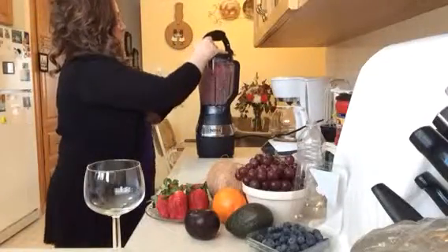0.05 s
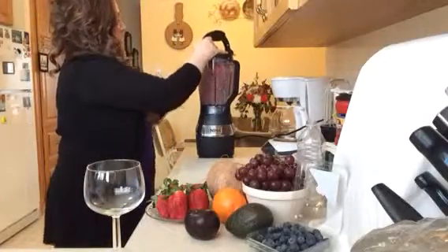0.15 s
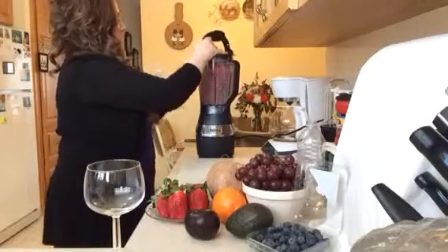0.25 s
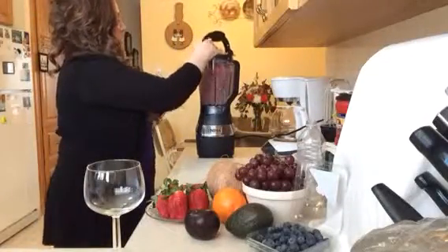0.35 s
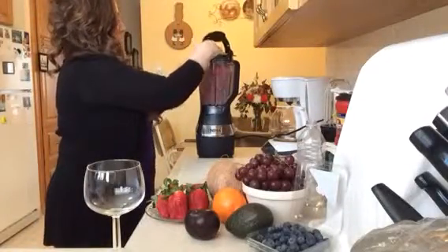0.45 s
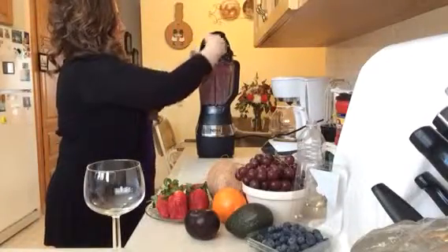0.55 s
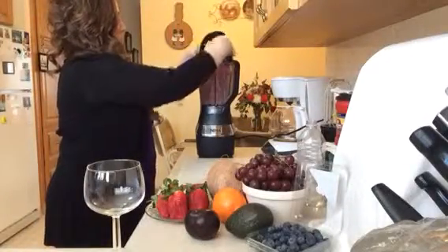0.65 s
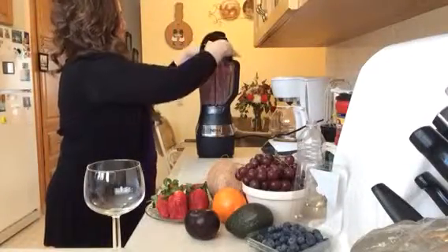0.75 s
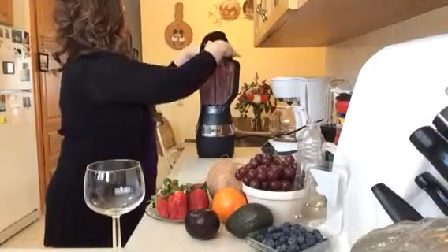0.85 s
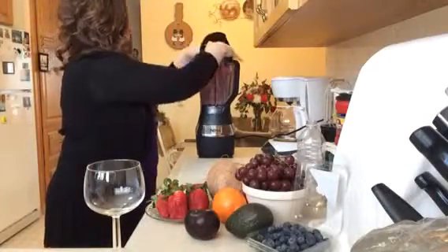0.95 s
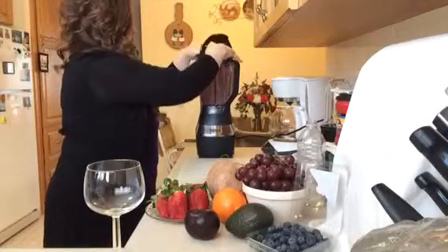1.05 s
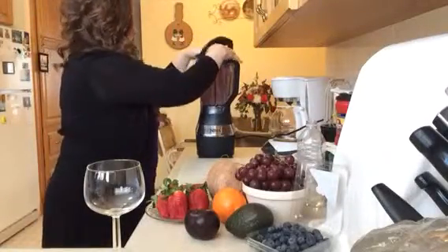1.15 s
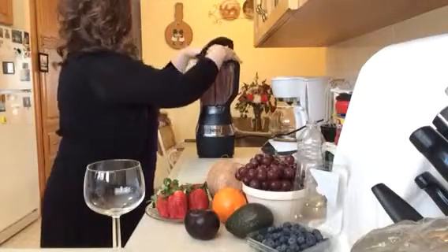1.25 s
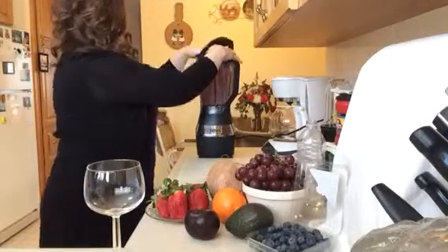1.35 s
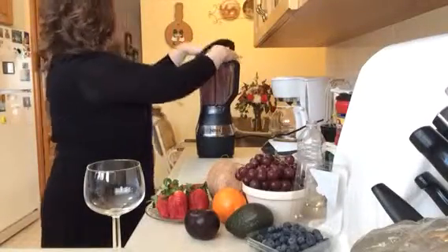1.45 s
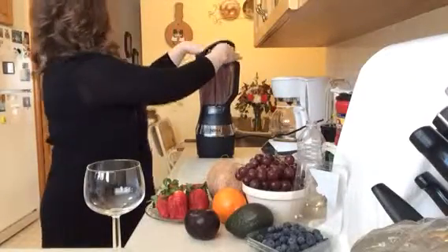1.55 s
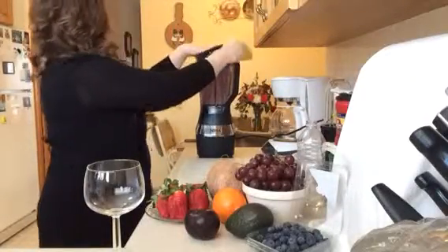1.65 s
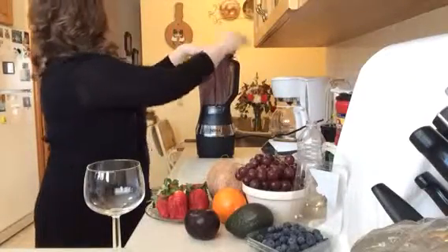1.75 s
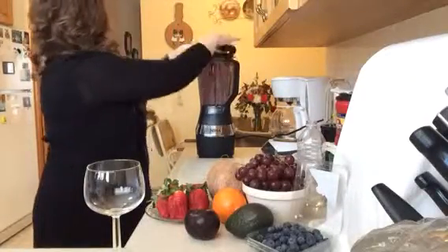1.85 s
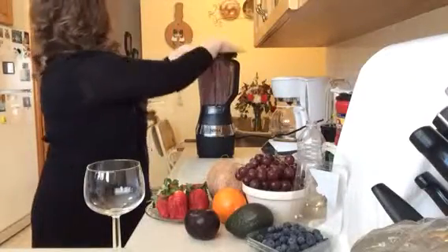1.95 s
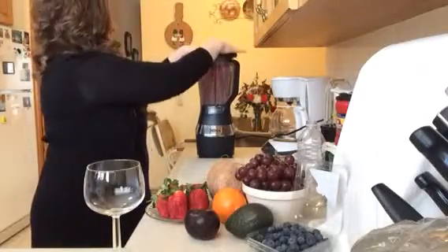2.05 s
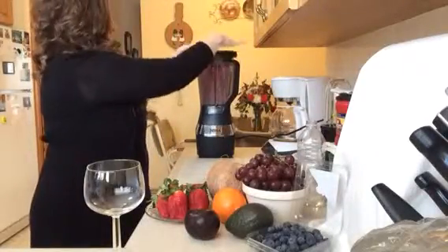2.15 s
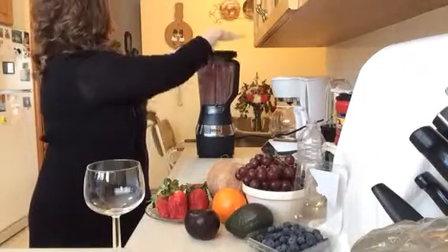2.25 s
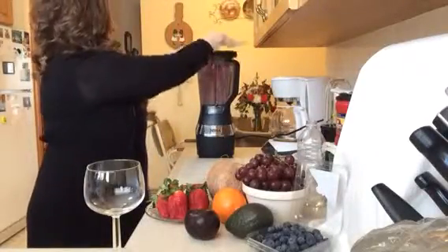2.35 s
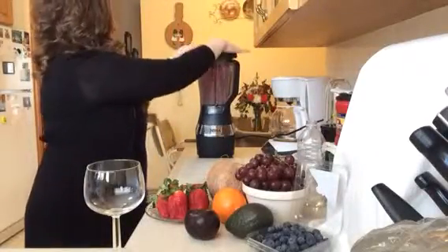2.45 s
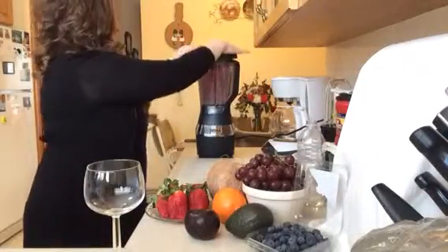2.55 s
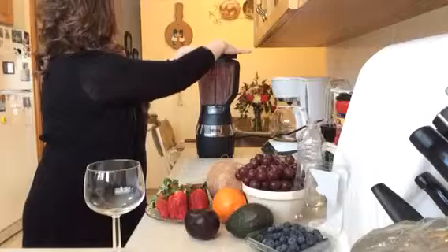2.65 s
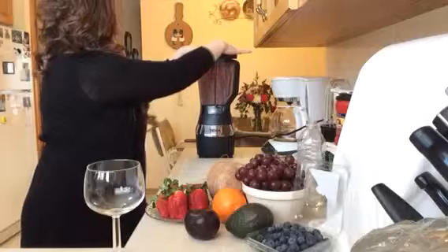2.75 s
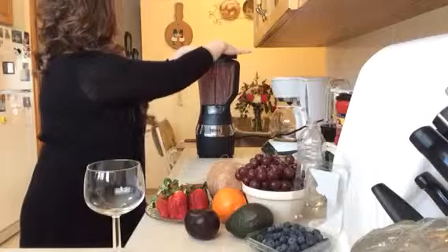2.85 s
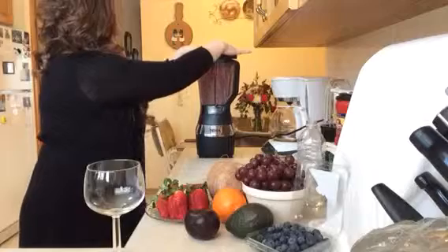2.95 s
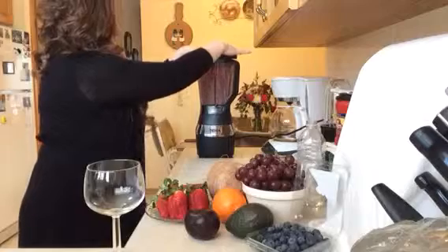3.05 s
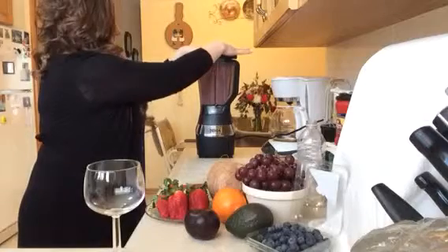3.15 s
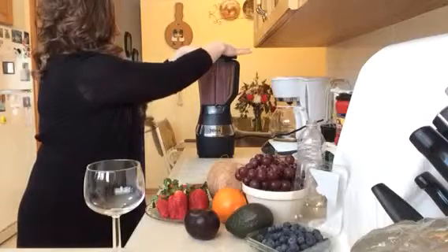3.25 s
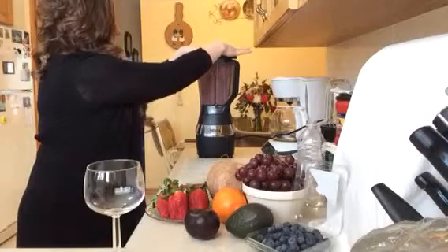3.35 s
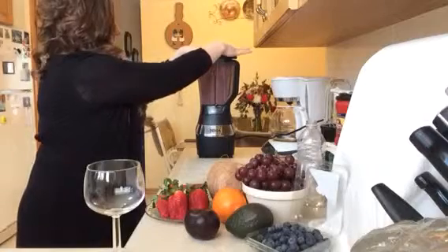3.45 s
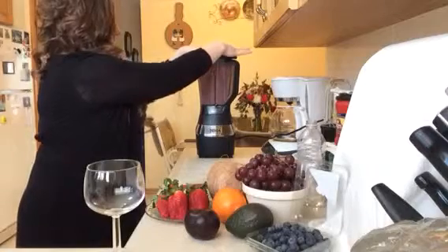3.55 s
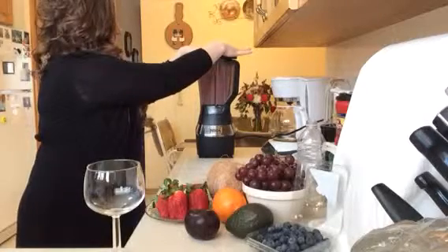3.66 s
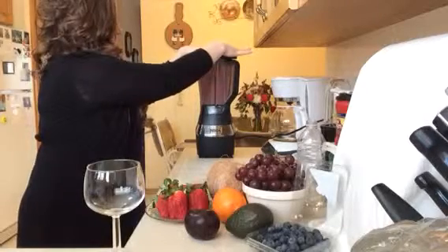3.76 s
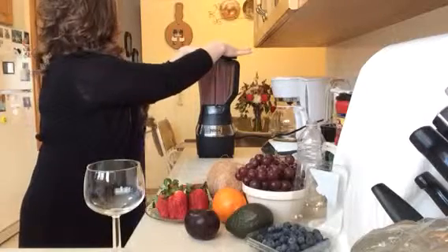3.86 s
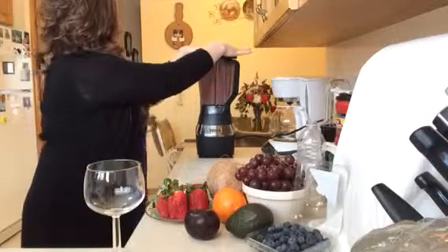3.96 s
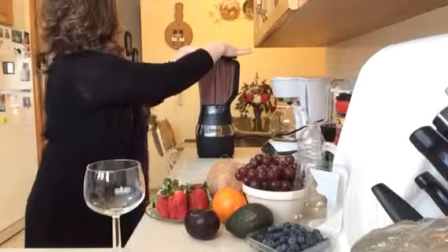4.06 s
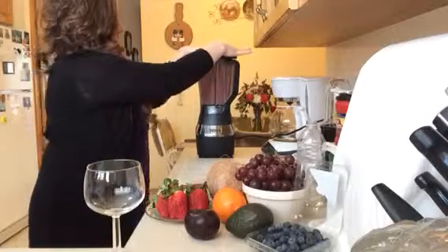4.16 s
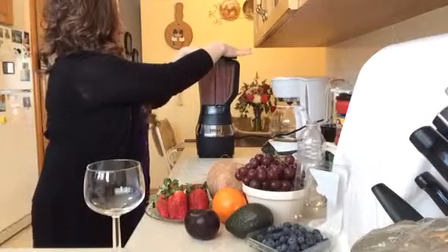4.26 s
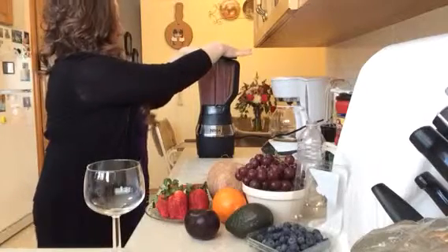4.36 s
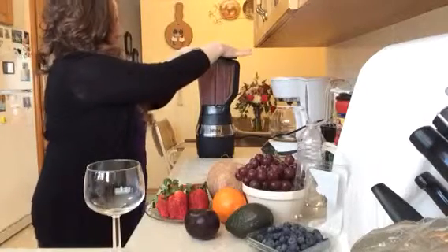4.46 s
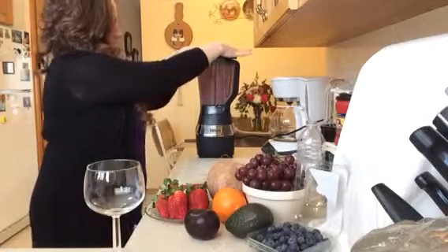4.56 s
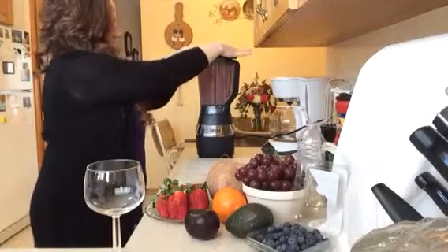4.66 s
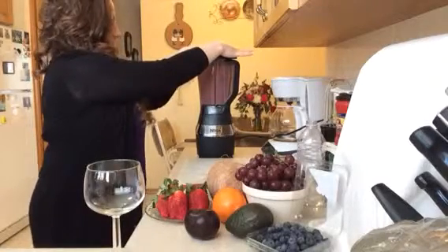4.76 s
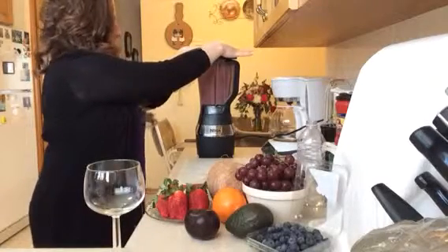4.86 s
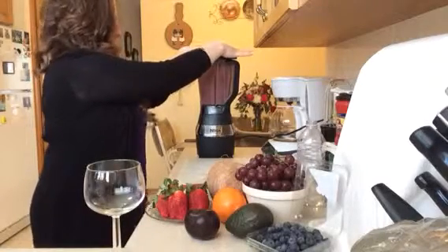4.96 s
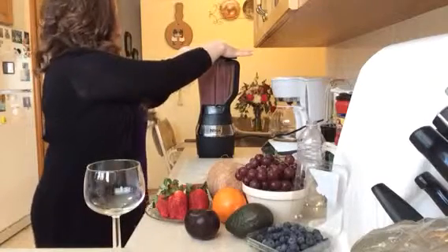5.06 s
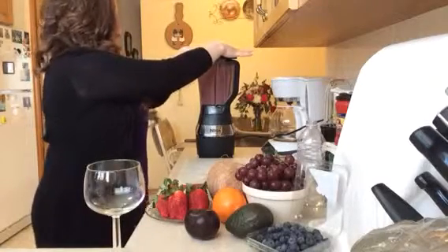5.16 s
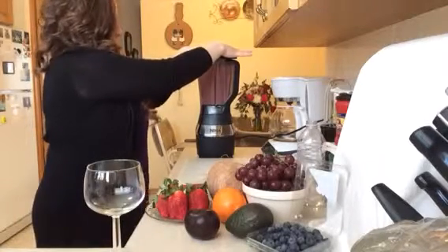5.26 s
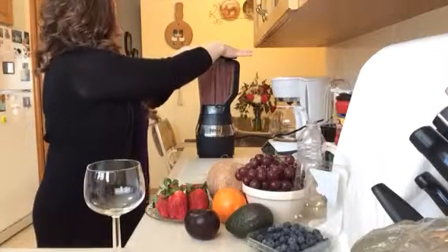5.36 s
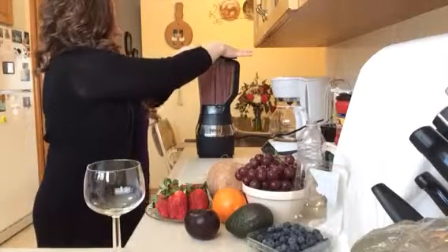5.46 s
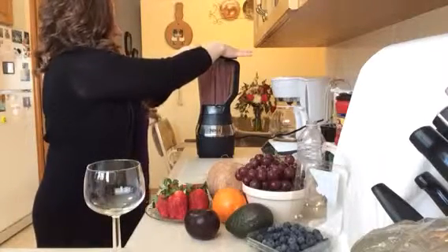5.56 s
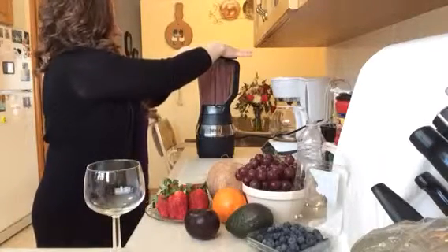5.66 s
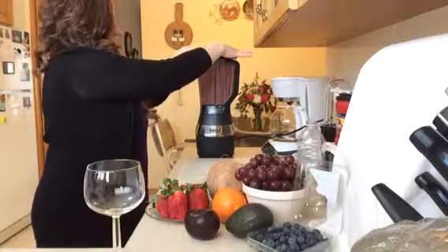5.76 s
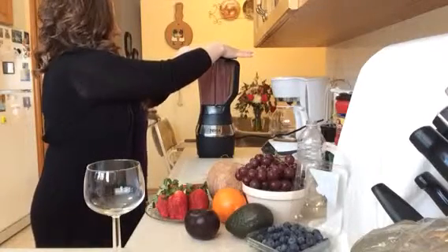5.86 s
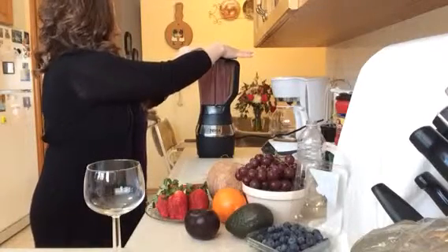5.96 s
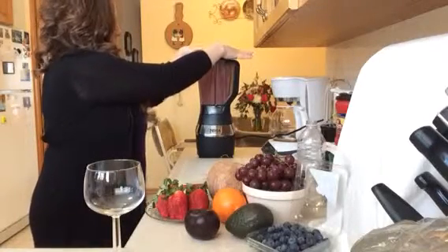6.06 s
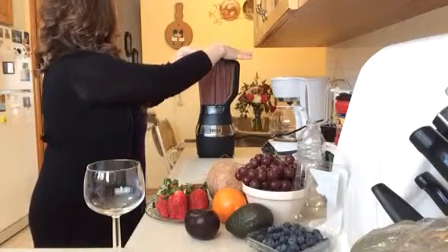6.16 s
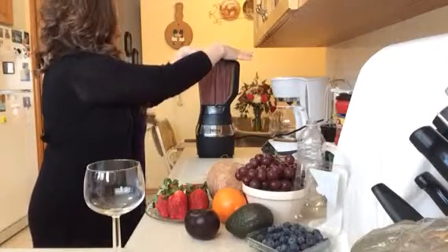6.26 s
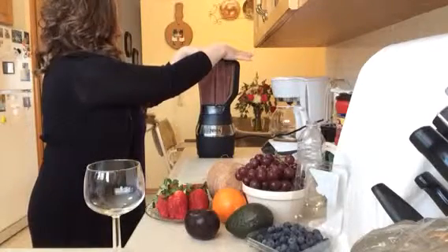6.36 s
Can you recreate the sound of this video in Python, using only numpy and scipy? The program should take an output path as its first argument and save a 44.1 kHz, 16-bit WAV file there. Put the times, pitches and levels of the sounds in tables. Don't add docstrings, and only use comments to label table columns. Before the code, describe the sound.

Soft plastic lid taps and clicks, a hard palm slap, a switch snap, then a blender spins up and roars steadily in a kitchen.

```python
import sys
import numpy as np
from scipy import signal
from scipy.fft import rfft, irfft
from scipy.io import wavfile

SR = 44100
rng = np.random.default_rng(int(sys.argv[2]) if len(sys.argv) > 2 else 0)


def volts_from_db(level):
    exponent = np.asarray(level, float) / 20
    return 10 ** exponent


def wrap_up_sound(samples):
    columns = np.atleast_2d(samples).T
    tamed = np.clip(columns, -1, 1)
    steps = np.round(tamed * 32767).astype(np.int16)
    wavfile.write(sys.argv[1], SR, steps)


N = 283122

# multiple_of_shaft_speed, level_db
LOW_ORDERS = [(9, -6), (11, -6), (12, 2), (14, -5), (24, -6)]
HIGH_ORDERS = [(36, 1), (48, -5.5), (60, -7.5)]
# frequency_hz, density_db_per_hz
CHURN_SPECTRUM = [(18, -60), (30, -23.5), (119, -9), (154, -8), (188, -3), (302, -9), (526, -16.5),
                  (684, -15.5), (846, -18.5), (1500, -19), (1950, -63), (3300, -120)]
HOUSING_SPECTRUM = [(820, -34), (1400, -13), (1690, 1.5), (2030, -0.5), (3390, -8), (4510, -10.5),
                    (5200, -32), (6760, -72), (11400, -120)]
AIR_SPECTRUM = [(2940, -22), (5000, -3), (6660, 0.5), (7250, -4.5), (8670, -4), (12900, -14.5),
                (14100, -14.5), (15400, 1)]
# centre_hz, width_hz, height_db over the broad noise
JUG_RINGS = [(126.6, 21, 6), (240.3, 11.3, 4.5), (526.5, 120, 8), (621, 9.7, 11.5), (836, 97, 4.5),
             (1036.7, 9.2, 10.5), (1260, 10.5, 8)]
HOUSING_RINGS = [(1649, 20, 4), (1744, 3.3, 15), (2012, 26, 2.5), (2350, 33, 3), (2347, 14, -1.5),
                 (2820, 180, 0), (3175, 12, 6), (3630, 41, 8.5), (4370, 8, 6), (4910, 840, 4)]
AIR_RINGS = [(5510, 89, -3), (6410, 54, -10), (7400, 33, -32), (8220, 160, -9), (9340, 65, -37),
             (10800, 200, 0)]
# time_s, size
SURGES = [
    (2.745, 1.2),
    (3.28, .2),
    (3.73, .9),
]
# start_s, peak_db
THUMPS = [
    (3.158, -39),
    (3.278, -15),
    (3.468, -16),
    (3.547, -26),
    (3.712, -23),
    (4.216, -46),
    (4.837, -42),
]
# frequency_hz, level_db, t60_s
BASE_MODES = [(124.7, 1.5, 0.3), (191, -44, 0.11), (231.5, -8, 0.063), (655, -21, 0.035)]
JOLT_MODES = [(127, .5, .2), (250, -4, .06), (610, -12, .06), (1350, -16, .04)]
# frequency_hz, level_db, t60_s
LID_MODES = [(1510, -6, 0.005), (2756, -5, 0.012), (3280, -3, 0.0074), (3920, -6, 0.0051),
             (4780, -3.5, 0.0037)]
JUG_WALL_MODES = [(268, -3.5, 0.044), (320, -3.5, 0.011), (570, -4.5, 0.013), (604, -6, 0.013),
                  (810, -10.5, 0.0067)]
RIM_MODES = [(6300, 0, .002), (8200, 1, .0025), (10300, -6, .0015)]
# start_s, peak_db, thud_db (rel), brightness_db (rel)
KNOCKS = [(0.043, -54.5, 8, -15), (0.148, -64.5, 16, -14), (0.374, -60.5, 16, -3), (0.484, -55.5, -4, -19),
          (0.655, -75, 1, -15), (0.7344, -67, 5, -16), (1.0107, -45, -13, -26), (1.0133, -49.5, 11.5, -29),
          (2.062, -52, 5, -15)]
CLICKS = [(0.843, -50.5, -5, -8), (1.11, -55, -6, -10), (1.128, -44.5, -5, -23), (1.152, -52, 2, -23),
          (1.272, -36.5, -3, -31), (1.292, -33.5, -4.5, -32), (1.3126, -44.5, -6, -33),
          (1.558, -62.5, 7, 2), (1.619, -47.5, -2, -15), (1.6916, -30.5, -8.5, -22),
          (1.7144, -43.5, 4.5, -5), (1.7718, -28, -4, -12.5), (1.786, -45.5, 10, -6),
          (2.736, -24.5, -10, -60)]
SLAPS = [
    (2.0998, -10, -19.5, -15.5),
    (2.103, -14, -18.5, -7),
    (2.108, -12.5, -14.5, -11.5),
    (2.1135, -19.5, -5, -9.5),
    (2.212, -32, -2, -32),
    (2.229, -34.5, -12, -27),
]
SWITCH = [
    (2.5522, -17, -16, -17),
    (2.558, -27, -4.5, -31),
]
# loudest_s, pitch_hz there, squeak_db, hiss_db just after
SLIPS = [
    (.272, 4370, -68, -68.5),
    (.418, 4100, -67, -68),
]
# frequency_hz, level_db
WALLS = [(150, -21), (600, 5), (3000, -4.9), (9000, -0.5), (15000, -5)]
# frequency_hz, t60_s
KITCHEN = [(100, 0.22), (500, 0.24), (3000, 0.26), (8000, 0.24), (15000, 0.15)]
# frequency_hz, level_db rms
FRIDGE = [(59.2, -55.5), (118.4, -64.5), (166.9, -74), (242.2, -73)]
# frequency_hz, density_db_per_hz
FLOOR_SPECTRUM = [(15, -23), (25, -4), (69, -25), (104, -2.5), (288, -13), (443, -10), (682, -27.5),
                  (1140, -29.5), (1260, -31), (2990, -37), (3710, -36.5), (8760, -42.5), (15400, -52.5)]

# level_db at running speed, db_per_db of speed, strain_db extra at the start
LOW_WHINE, HIGH_WHINE = (-48, .9, 12), (-52, 6.5, 14)
CHURN_LAW, HOUSING_LAW, AIR_LAW = (-30.5, 0.49, 3.9), (-34.5, 0.98, 2.2), (-40.5, 1.14, 0.5)
# ring_hz, ring_db, chatter_s
KNOCK, CLICK, SLAP, SNAP = (1970, 4.4, .011), (3700, 3.5, .011), (3250, 0, .0044), (2800, 1.8, .0044)

START_S = 2.735
RUNNING_SPEED, GAIN_PER_S = 174.5, 4.5
ROTOR_LAG, ROTOR_S = 120, .095
PULP_LAG, PULP_S = 32, .25
STRAIN_S, SMOOTH_S = 0.56, 2.27
SHAKE_DB, SHAKE_DAMPED_DB = -30, 14.5
BLUR_DB_PER_S, LUMPS_DB = 1.8, .9
SURGE_DB, SURGE_S = 4, .04
JOLT_S, JOLT_DB = 2.737, -20
PUSH_S, PUSH = 0.00039, .5
GLIDE_HZ_PER_S, SQUEAK_DB_PER_S = 17000, 600
HISS_LAG_S, HISS_RISE_DB_PER_S, HISS_FALL_DB_PER_S = (0.037, .001), 330, (120, 600)
RUB_S, RUB_DB = (.25, .56), -85
FLOOR_DB = -60.5


def run_up():
    since = np.arange(N) / SR - START_S
    t = np.maximum(since, 0)
    rotor_lag = ROTOR_LAG * np.exp(-(t / ROTOR_S) ** 1.5)
    pulp_lag = PULP_LAG * np.exp(-t / PULP_S)
    turns = RUNNING_SPEED + GAIN_PER_S * t - rotor_lag - pulp_lag
    speed_db = 20 * np.log10(np.minimum(turns / RUNNING_SPEED, 1))
    strain = np.exp(-t / STRAIN_S)

    def gain(law):
        level_db, db_per_db, strain_db = law
        return (since >= 0) * volts_from_db(level_db + db_per_db * speed_db + strain_db * strain)

    return t, turns, gain


def motor_tones(t, turns, gain):
    wobble = 1 + .003 * drift(5) + .0055 * drift(60)
    angle = 2 * np.pi * np.cumsum(turns * wobble) / SR
    low = sum(volts_from_db(db + 3 * drift(15)) * np.sin(order * angle) for order, db in LOW_ORDERS)
    high = 0
    for i, (order, db) in enumerate(HIGH_ORDERS):
        level_db = db + 2.5 * drift(15) - BLUR_DB_PER_S * i * t
        high = high + volts_from_db(level_db) * np.sin(order * angle)
    sidebands = 1 + .6 * np.sin(angle) + .25 * np.sin(2 * angle)
    whine = (gain(LOW_WHINE) * low + gain(HIGH_WHINE) * high) * sidebands
    whine = humps(whine, HOUSING_RINGS + AIR_RINGS)
    shake_db = SHAKE_DB - SHAKE_DAMPED_DB * np.exp(-t / SMOOTH_S) + 0.22 * drift(1.9)
    shake = volts_from_db(shake_db) * np.sqrt(2) * np.sin(angle)
    return (t > 0) * whine, (t > 0) * shake, angle


def roar(t, angle, gain):
    white = rng.standard_normal((3, N))
    beat = np.sin(2 * angle)
    surge_db = sum(SURGE_DB * size * np.exp(-((t + START_S - s) / SURGE_S) ** 2) for s, size in SURGES)
    lumpy = white[0] * volts_from_db(LUMPS_DB * drift(45))
    shaken = white[1] * (1 + 0.069 * beat) * volts_from_db(1.0 * drift(37))
    blown = white[2] * (1 + 0.038 * beat) * volts_from_db(0.58 * drift(30))
    churn = gain(CHURN_LAW) * volts_from_db(surge_db) * coloured(lumpy, CHURN_SPECTRUM, JUG_RINGS)
    housing = gain(HOUSING_LAW) * coloured(shaken, HOUSING_SPECTRUM, HOUSING_RINGS)
    air = gain(AIR_LAW) * coloured(blown, AIR_SPECTRUM, AIR_RINGS)
    return churn + housing + air


def thumps():
    blows, kick = np.zeros((2, N))
    for s, peak_db in THUMPS:
        blows[round(s * SR)] = volts_from_db(peak_db - 10)
    rocks = round(JOLT_S * SR) + np.array([0, 347, 1390, 2084])
    kick[rocks] = volts_from_db(JOLT_DB) * np.array([.6, .7, .35, .35])
    rings = ring(blows, BASE_MODES) + ring(kick, JOLT_MODES)
    return signal.sosfilt(signal.butter(2, [95, 1500], "band", fs=SR, output="sos"), rings)


def strike(row, kind, t, thin):
    _, peak_db, thud_db, bright_db = row
    ring_hz, ring_db, chatter_s = kind
    tick = rng.standard_normal(len(t)) * (0.15 + (rng.random(len(t)) < .15))
    before, after = np.minimum(t, 0), np.maximum(t, 0)
    swell = np.exp(before / 0.00078) + 0.19 * np.exp(before / 0.0043)
    tick = tick * swell * np.exp(-after / chatter_s)
    spread_db = 2.5 * rng.standard_normal(len(LID_MODES))
    lightness = np.clip(-20 - peak_db, 0, 20) / 20
    bend = 1 + lightness * .025 * spread_db
    lid = [(hz * b, db + d, t60) for (hz, db, t60), d, b in zip(LID_MODES, spread_db, bend[::-1])]
    lid.append((ring_hz * bend[0], ring_db, .005))
    shove = tick + PUSH * np.exp(-((t - .002) / PUSH_S) ** 2)
    parts = [signal.sosfilt(thin, ring(tick, lid)), ring(shove, JUG_WALL_MODES), ring(tick, RIM_MODES)]
    body, thud, edge = [part / np.abs(part).max() for part in parts]
    mixed = body + volts_from_db(thud_db + 3.0) * thud + volts_from_db(bright_db + 7.0) * edge
    return volts_from_db(peak_db + 1.0) * mixed


def contacts():
    size, lead = 6000, 400
    t = (np.arange(size) - lead) / SR
    thin = signal.butter(2, 1200, "high", fs=SR, output="sos")
    out = np.zeros(N + size)
    for rows, kind in ((KNOCKS, KNOCK), (CLICKS, CLICK), (SLAPS, SLAP), (SWITCH, SNAP)):
        for row in rows:
            at = round(row[0] * SR) - lead
            out[at:at + size] += strike(row, kind, t, thin)
    no_boom = signal.butter(4, 200, "high", fs=SR, output="sos")
    soft = signal.butter(2, 12500, fs=SR, output="sos")
    return signal.sosfilt(np.vstack([no_boom, soft]), out[:N])


def seal():
    t = np.arange(N) / SR
    rough = 1 + .035 * drift(200)
    squeak = 0
    rub = volts_from_db(RUB_DB) * (t > RUB_S[0]) * (t < RUB_S[1])
    for (s, pitch_hz, squeak_db, hiss_db), lag, fall in zip(SLIPS, HISS_LAG_S, HISS_FALL_DB_PER_S):
        glide_hz = pitch_hz + GLIDE_HZ_PER_S * np.clip(t - s, -.05, .006)
        phase = 2 * np.pi * np.cumsum(glide_hz * rough) / SR
        tone = 0.82 * np.sin(phase) + 1.2 * np.sin(2 * phase) + 0.27 * np.sin(3 * phase)
        squeak = squeak + volts_from_db(squeak_db - SQUEAK_DB_PER_S * np.abs(t - s)) * tone
        after = t - s - lag
        rub = rub + volts_from_db(hiss_db + np.minimum(HISS_RISE_DB_PER_S * after, -fall * after))
    spectrum = [(2500, -11), (4000, -2), (8000, 7), (12000, -7), (15000, -18.5)]   # frequency_hz, density_db
    return squeak + rub * coloured(rng.standard_normal(N), spectrum)


def kitchen(x, wet_db):
    t = np.arange(SR // 2) / SR
    edges = 60 * 2. ** np.arange(9)
    tail = np.zeros(len(t))
    for low, high in zip(edges, edges[1:]):
        centre = np.sqrt(low * high)
        octave = signal.butter(2, [low, high], "band", fs=SR, output="sos")
        band = signal.sosfilt(octave, rng.standard_normal(len(t)))
        tail += band * volts_from_db(at_hz(WALLS, centre) - 60 * t / at_hz(KITCHEN, centre))
    tail *= np.clip((t - .002) / 0.011, 0, 1)
    tail *= volts_from_db(wet_db) / np.sqrt(np.sum(tail ** 2))
    tail[0] = 1
    return signal.fftconvolve(x, tail)[:N]


def background():
    t = np.arange(N) / SR
    hum = 0
    for hz, db in FRIDGE:
        line = np.sin(2 * np.pi * hz * t + 0.35 * drift(5.1))
        hum = hum + volts_from_db(db + .5 * drift(6)) * np.sqrt(2) * line
    unsteady = rng.standard_normal(N) * volts_from_db(1.2 * drift(8))
    return hum + volts_from_db(FLOOR_DB) * coloured(unsteady, FLOOR_SPECTRUM)


def rms_one(x):
    return x / np.sqrt(np.mean(x ** 2) + 1e-20)


def at_hz(points, hz):
    f, v = np.transpose(points)
    return np.interp(np.log(hz + 1e-9), np.log(f), v)


def drift(rate):
    r = np.exp(-80 * np.pi * rate / SR)
    slow = signal.lfilter([1], [1, -2 * r, r * r], rng.standard_normal(N // 40 + 2002))[2000:]
    return np.interp(np.arange(N) / 40, np.arange(len(slow)), rms_one(slow))


def ring(clicks, modes):
    out = np.zeros(len(clicks))
    for hz, level_db, t60 in modes:
        r = volts_from_db(-60 / (max(t60, .001) * SR))
        w = 2 * np.pi * hz / SR
        out += signal.lfilter([0, volts_from_db(level_db) * np.sin(w)], [1, -2 * r * np.cos(w), r * r], clicks + 1e-18)
    return out


def humps(x, rings):
    hz = np.arange(N // 2 + 1) * SR / N
    lift = sum(volts_from_db(db) / (1 + (2 * (hz - centre) / width) ** 2) for centre, width, db in rings)
    return irfft(rfft(x) * (1 + lift), N)


def coloured(drive, spectrum, rings=()):
    hz = np.arange(N // 2 + 1) * SR / N
    inside = (hz > spectrum[0][0] * .9) * (hz < spectrum[-1][0] * 1.05)
    gain = volts_from_db(at_hz(spectrum, hz)) * inside
    return rms_one(humps(irfft(rfft(drive) * gain, N), rings))


def scene():
    t, turns, gain = run_up()
    whine, shake, angle = motor_tones(t, turns, gain)
    near = kitchen(contacts() + seal() + thumps() + 0.62 * whine, wet_db=-4.5)
    steady = .4 * whine + shake + roar(t, angle, gain)
    return np.tile(near + steady + background(), (2, 1))


def roll_off(x):
    return signal.sosfilt(signal.butter(12, 15550, fs=SR, output="sos"), x)


def record(dry):
    mix = signal.sosfilt(signal.cheby2(12, 60, 15550, fs=SR, output="sos"), dry)
    return roll_off(mix)


dry = scene()
out = record(dry)
wrap_up_sound(out)
```